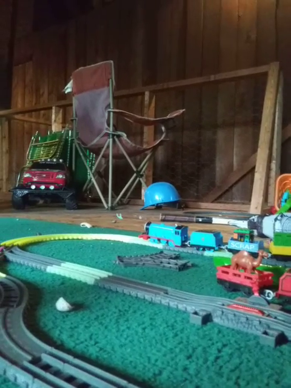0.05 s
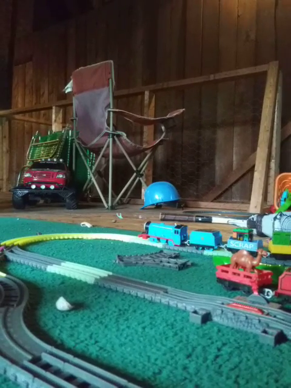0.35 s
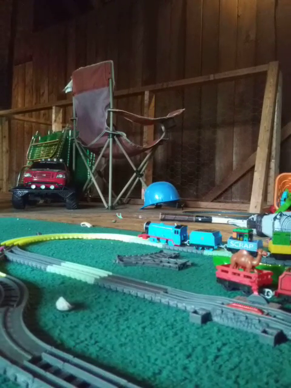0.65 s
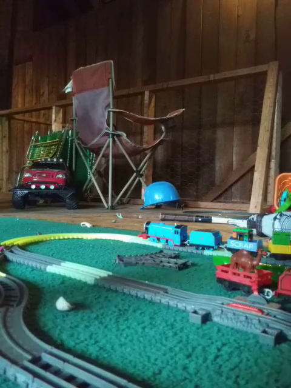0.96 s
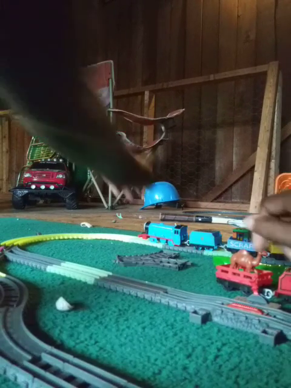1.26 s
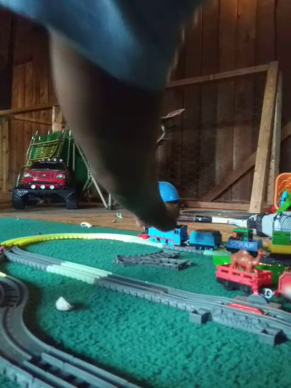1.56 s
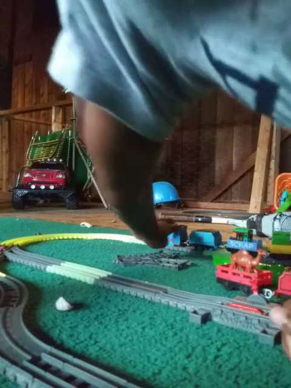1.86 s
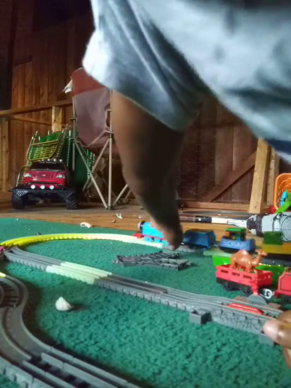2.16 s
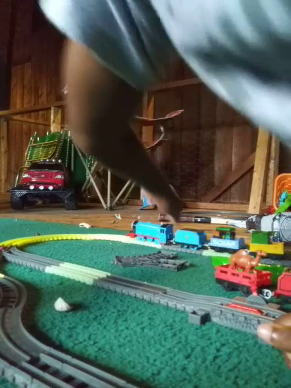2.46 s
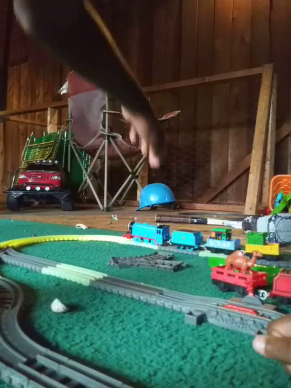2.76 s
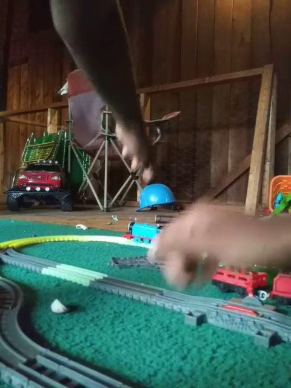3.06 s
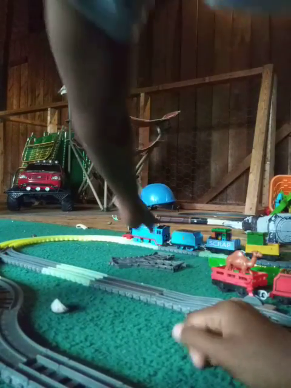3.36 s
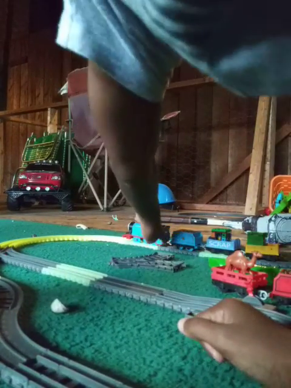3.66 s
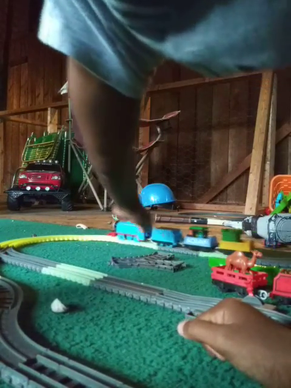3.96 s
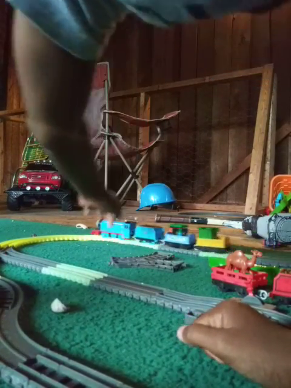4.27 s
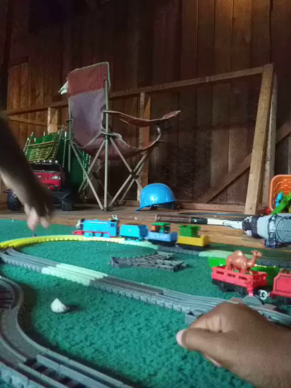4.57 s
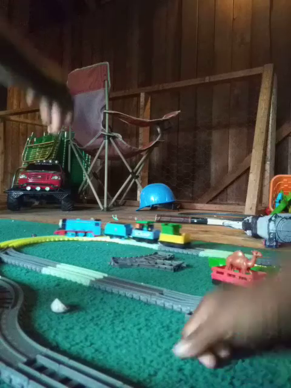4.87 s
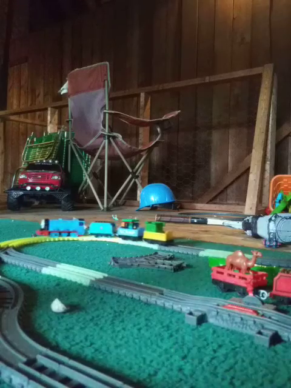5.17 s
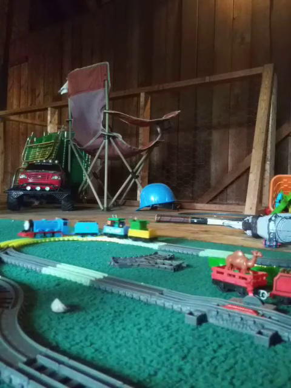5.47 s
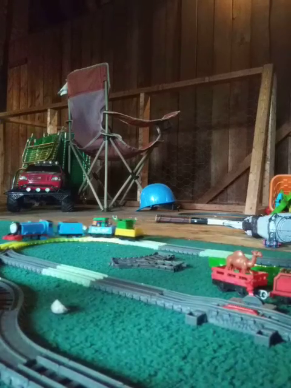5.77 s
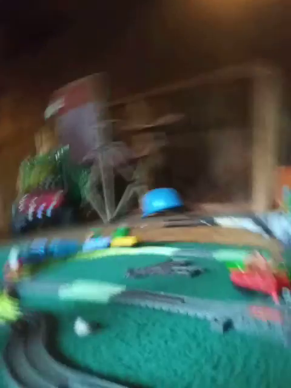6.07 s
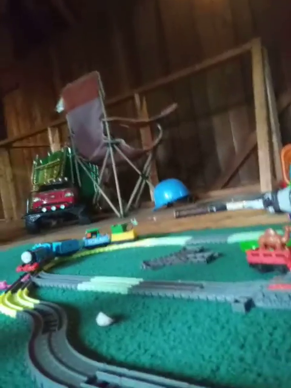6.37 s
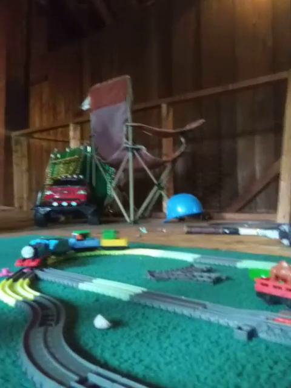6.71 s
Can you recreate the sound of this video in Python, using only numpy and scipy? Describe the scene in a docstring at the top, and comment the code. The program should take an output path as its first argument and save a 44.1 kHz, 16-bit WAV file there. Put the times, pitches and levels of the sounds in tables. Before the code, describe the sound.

A small battery toy train motor whirs quietly throughout, with a thin gear whine, in a wooden room with little echo. Plastic track clacks lightly in the first moment, and clothes swish close by at about 1 second, followed by soft bumps. From there the wheels rumble and rattle faintly along the track, swelling slightly when a hand pushes the engine around 2 and 4 seconds. Stiff plastic snaps in quick pairs at about 1.6, 2.8 and 4.6 seconds, and once more at 5.6. Wagons click sharply near 1.9 seconds, with a trail of smaller ticks, and again at 5. Clothing brushes softly now and then. At about 5.9 seconds fingers grab the microphone, making a dense run of close knocks, hollow thumps and rubbing, by far the loudest part. Lighter knocks and scratchy crackles follow from 6.5 seconds to the end, just before 7.

```python
"""A battery toy train whirs and rattles along plastic track on a carpet in a wooden room.
Gear teeth sound through its shell, wheels drum on the track, wagons click; under a pushing hand
it rumbles and rattles louder. Clothes brush past close by and stiff plastic snaps, mostly in pairs.
At the end a camera is grabbed and moved: fingers knock and rub on its case."""
import sys
import numpy as np
from scipy import signal
from scipy.fft import rfft, irfft, next_fast_len
from scipy.io import wavfile
from scipy.ndimage import map_coordinates

SR = 44100
rng = np.random.default_rng(int(sys.argv[2]) if len(sys.argv) > 2 else 0)


def materialize(psi):
    """Save the field psi as 16-bit PCM at rate SR to the path in sys.argv[1].

    A 1-D psi becomes a single channel; in a 2-D psi each row is a channel.
    """
    bounded = np.clip(np.atleast_2d(psi).T, -1, 1)
    quanta = np.round(bounded * 32767).astype(np.int16)
    wavfile.write(sys.argv[1], SR, quanta)


N = 301644
NOW_S = np.arange(N) / SR
AGE_S = np.arange(SR // 5) / SR  # time since a contact

# Room decay. Each row: frequency in Hz, t60 in seconds.
ROOM_DECAY = [(150, 0.12), (1500, 0.27), (10000, 0.23)]

# Noise spectra of cloth, skin, case and train. Each row: frequency in Hz, relative density in dB.
HISS_SPECTRUM = [(60, -50), (300, -15.5), (900, -3.5), (1500, 0), (2800, 3.5), (4000, -7), (5300, -8.5),
                 (6500, -5.5), (7800, -4.5), (9000, -14.5), (11500, -29), (15500, -47)]
RUSH_SPECTRUM = [(40, -45), (110, -20.5), (220, -1.5), (350, 7), (500, 5), (700, 6.5), (950, -2.5),
                 (1200, -6), (3000, -45)]
SKIN_SPECTRUM = [(300, -8), (900, 0), (1500, -2), (2800, 0.5), (4000, -5), (5300, -7.5), (6500, -7),
                 (7800, -1.5), (9000, -15.5), (11500, -27.5), (15500, -22)]
CRACKLE_SPECTRUM = [(100, -43), (500, -14), (2500, -41), (5000, -13.5), (7600, 1), (9500, -14.5),
                    (12000, -23), (15500, -40)]
CASE_SPECTRUM = [(80, -8), (200, 1), (500, -1.5), (1000, 4.5), (1500, -5), (2100, 1), (2800, -3.5),
                 (3800, -16), (5500, -19.5), (7600, -15), (9500, -31.5), (12000, -43), (15500, -35)]
HOLLOW_SPECTRUM = [(40, -5), (90, -0.5), (150, 1), (260, -1), (420, 5), (680, 1), (1000, -6.5),
                   (1600, -9.5), (3000, -57)]
RUMBLE_SPECTRUM = [(40, -37), (100, -18), (170, -8), (260, 2.5), (400, -3.5), (700, -8.5), (1100, -16),
                   (2000, -46.5)]
RATTLE_SPECTRUM = [(600, -35), (1300, -2), (1800, 7), (2200, 4.5), (2600, 8.5), (3200, -2.5), (4000, -12),
                   (5300, -18), (6500, -16), (7900, -10), (9300, -38), (12000, -72)]
GEAR_SPECTRUM = [(60, -6.5), (130, 8), (300, 8.5), (700, 8.5), (2800, -23.5), (4000, -12), (5500, -9.5),
                 (7600, -15), (9500, -15), (12000, -26), (15500, -19)]

# Modes of struck plastic parts. Each row: frequency in Hz, level in dB, t60 in seconds.
TRACK_MODES = [(598, -7.5, 0.057), (944, -15, 0.11), (1840, -8.5, 0.069), (2130, 0.5, 0.044),
               (2570, -2, 0.028), (3300, -11, 0.039), (4600, -11, 0.014)]
SNAP_MODES = [(340, -11.5, 0.044), (560, -3.5, 0.0049), (1132, -1, 0.012), (1494, -3, 0.012),
              (2288, -7, 0.012), (3320, -11.5, 0.0094), (4680, -14.5, 0.0088), (7500, -36, 0.0038),
              (9310, -15.5, 0.0051)]
WAGON_MODES = [(231, -23, 0.023), (1690, -5.5, 0.0078), (2510, -3.5, 0.01), (2780, -2, 0.0072),
               (3075, -8, 0.015), (4700, -25, 0.012), (8000, -29, 0.0068)]

# Axle and engine shell resonances. Each row: centre in Hz, width in Hz, gain in dB.
AXLE_PEAKS = [(1780, 73, -4), (2566, 58, 4), (2950, 220, -10), (4400, 140, -15.5), (6420, 220, -15.5),
              (7500, 250, -16.5), (8180, 190, -12.5)]
SHELL_PEAKS = [(292, 360, -11), (518, 67, -5.5), (916, 144, -2.5), (1310, 170, -3), (1640, 130, -4.5),
               (1740, 71, -2), (1903, 61, -2.5), (2350, 114, -5.5), (2560, 250, -7), (2940, 170, -11),
               (3240, 130, -10.5), (7500, 900, -14.5)]

# Clothes brushing, fingers sliding. Each row: start and length in seconds, hiss and low rush in dB.
CLOTH_STROKES = [(0, 0.048, -51, -56.5), (.09, 0.13, -52, -40), (.41, 0.045, -53, -54),
                 (.68, .19, -54, -59.5), (.89, 0.27, -36.5, -34.5), (1.15, 0.23, -63.5, -64),
                 (1.38, 0.15, -48, -58), (2.57, .16, -51, -59), (2.81, 0.14, -49, -47.5),
                 (4.66, 0.67, -55.5, -53), (5.48, .29, -48.5, -43.5), (5.73, 0.15, -53.5, -45.5)]
FINGER_STROKES = [(2.61, .08, -50.5, -47), (5.94, 0.089, -39.5, -27.5), (6.008, 0.15, -28.5, -27),
                  (6.14, 0.13, -45, -23.5), (6.25, .1, -60, -42.5), (6.38, 0.078, -57, -51.5),
                  (6.51, 0.12, -41, -36), (6.578, 0.071, -24, -37.5), (6.655, 0.054, -37.5, -40),
                  (6.7, 0.15, -45, -45)]
# Knocks on and beside the camera.
# Each row: start in seconds, level in dB, ring in Hz, t60 in seconds, thud in dB.
CASE_KNOCKS = [(0.055, -38, 607, 0.043, -33.5), (0.1308, -20, 1117, 0.03, -27),
               (0.166, -35, 586, 0.11, -24), (.418, -27, 460, 0.022, -46), (2.663, -31.5, 560, 0.025, -41),
               (3.424, -38, 920, 0.029, -58), (4.046, -31, 886, 0.018, -46),
               (4.7951, -30.5, 1400, 0.019, -50), (5.928, -26.5, 1180, 0.067, -18.5),
               (5.945, -16.5, 2250, 0.039, -41), (5.96, -3.5, 1160, 0.033, -2.5),
               (6.0128, -5.5, 1066, 0.038, -4.5), (6.0465, -7.5, 490, 0.024, -4.5),
               (6.084, -4, 928, 0.042, -15), (6.15, -9, 620, 0.038, -16), (6.1592, -13, 854, 0.1, -12),
               (6.185, -20.5, 1790, .034, -30), (6.198, -9.5, 493, 0.033, -8.5),
               (6.2092, -7.5, 1360, 0.017, -20), (6.2162, -10, 1937, 0.06, -27),
               (6.2406, -6, 1870, 0.021, -24), (6.308, -24.5, 1926, 0.025, -23),
               (6.471, -26.5, 1150, 0.051, -53.5), (6.486, -27.5, 1217, 0.11, -47),
               (6.516, -24, 1320, 0.035, -48), (6.5371, -12, 1150, 0.019, -17.5),
               (6.581, -21.5, 1950, 0.042, -23), (6.597, -8.5, 855, 0.011, -28),
               (6.653, -18.5, 2020, 0.0096, -33.5), (6.699, -10.5, 1290, 0.0066, -38),
               (6.7615, -14, 1430, 0.013, -16.5)]
# Soft bumps through floor and case. Each row: start in seconds, level in dB, pitch in Hz.
SOFT_BUMPS = [(0.09, -29, 193), (0.107, -27, 130), (1.097, -21.5, 396), (1.3311, -21.5, 201),
              (1.856, -39, 203), (2.584, -32.5, 127), (5.955, -3.5, 238), (5.993, -10, 200),
              (6.097, -6.5, 215), (6.162, -5.5, 171), (6.221, -8.5, 259), (6.315, -26, 204)]
# Cloth and skin catching. Each row: start in seconds, level in dB.
CRACKLES = [(.012, -26.5), (0.0281, -27.5), (0.3843, -32), (2.2895, -45), (2.6526, -20.5), (5.9594, -12),
            (6.081, -14), (6.5972, -14), (6.636, -10), (6.6835, -16), (6.734, -23), (6.7968, -20.5)]
# Track settling. Each row: start in seconds, level in dB, factor on the ring time.
TRACK_CLACKS = [(0.0894, -22.5, 0.51), (.103, -22, 0.42), (.212, -22, 1.25)]
# Plastic snapping over and back. Each row: start in seconds, level in dB, relative crack in dB.
PLASTIC_SNAPS = [(1.618, -24.5, -6), (1.666, -17.5, -1.5), (2.772, -12.5, -5), (2.8, -18, -0.5),
                 (4.639, -9.5, -3), (4.6692, -16.5, -2.5), (5.6054, -20, -1.5)]
# Wagons and couplings clicking. Each row: start in seconds, level in dB, ring in Hz.
WAGON_CLICKS = [(1.487, -25.5, 3300), (1.5125, -35, 3480), (1.583, -29.5, 2860), (1.607, -33, 3070),
                (1.859, -8, 2330), (1.881, -23, 2740), (1.89, -24, 2770), (1.9662, -20, 2140),
                (1.979, -22, 1880), (2.0058, -29, 1880), (2.04, -31, 2030), (2.135, -34.5, 1920),
                (3.892, -32.5, 6560), (4.115, -38, 2900), (5.064, -17, 1690), (5.19, -32.5, 1990),
                (5.2143, -33.5, 1980)]
# A hand pushing the engine.
# Each row: start and length in seconds, rumble and rattle in dB, one unused value.
HAND_PUSHES = [(1.6, 0.16, -54.5, -61, -70), (2.15, .27, -57, -60.5, -49), (3.82, .17, -54, -50.5, -47),
               (3.94, 0.24, -59, -53, -51), (4.16, 0.31, -69, -55.5, -48)]
# Free rolling. Each row: time in seconds, rumble in dB, rattle in dB.
ROLL_LEVELS = [(1.1, -60, -63), (1.4, -53, -61.5), (2.05, -58.5, -56.5), (2.55, -64, -58),
               (2.95, -57.5, -66.5), (3.75, -60, -65), (4.55, -51.5, -58.5), (4.72, -51.5, -53),
               (5.03, -48, -54.5), (5.33, -54, -59), (5.55, -52, -54)]
# Gear whine. Each row: multiple of the shaft rate, level in dB.
WHINE_PARTIALS = [(3, -12.5), (5, 0.5), (14, -2.5), (20, -4.5), (29, -20), (33, -1), (41, 4)]
# Motor level, set by distance and load. Each row: time in seconds, level in dB.
MOTOR_LEVELS = [(0, -53.5), (.6, -57), (1.3, -53.5), (2.1, -58.5), (3.1, -55), (3.7, -58.5), (4.5, -60.5),
                (5.4, -57), (6.4, -51.5), (6.84, -50)]


def amp(db):
    """Decibels to gain."""
    return 10 ** (np.asarray(db) / 20)


def unit_rms(x):
    """Scale to rms 1."""
    return x / np.sqrt(np.mean(x ** 2) + 1e-20)


def unit_peak(x):
    """Scale to peak 1."""
    return x / (np.abs(x).max() + 1e-20)


def log_interp(points, hz):
    """Read (Hz, value) points on a log axis."""
    knots_hz, values = np.transpose(points)
    return np.interp(np.log(hz + 1), np.log(knots_hz + 1), values)


def curves(rows):
    """Per-sample curve for each column after the time."""
    times_s, *columns = np.transpose(rows)
    return [np.interp(NOW_S, times_s, column) for column in columns]


def wobble(rate_hz):
    """Smooth random curve."""
    return map_coordinates(rng.standard_normal(int(N * rate_hz / SR) + 4), [NOW_S * rate_hz])


def strokes(rows, column, roundness=0.67):
    """Gain of strokes that swell and die; column picks the level."""
    gain = np.zeros(N)
    for row in rows:
        start_s, length_s = row[:2]
        progress = np.clip((NOW_S - start_s) / length_s, 0, 1)
        gain += amp(row[column]) * np.abs(np.sin(np.pi * progress)) ** roundness
    return gain


def filtered(x, response):
    """Apply a complex frequency response."""
    size = next_fast_len(len(x) + SR // 4)
    return irfft(rfft(x, size) * response(np.fft.rfftfreq(size, 1 / SR)), size)[:len(x)]


def coloured(x, spectrum, size=4096):
    """Minimum-phase filter with the given spectrum."""
    cepstrum = irfft(np.log(amp(log_interp(spectrum, np.fft.rfftfreq(size, 1 / SR)))))
    cepstrum[1:size // 2] *= 2
    cepstrum[size // 2 + 1:] = 0
    return signal.fftconvolve(x, irfft(np.exp(rfft(cepstrum))))[:len(x)]


def resonances(x, peaks, edge_hz):
    """Drive a body's resonances, rolled off above edge_hz; rms 1."""
    def response(hz):
        body = 0
        for k, (centre_hz, width_hz, db) in enumerate(peaks):
            damping = 1j * hz * width_hz
            body += (-1) ** k * amp(db) * damping / (centre_hz ** 2 - hz ** 2 + damping)
        return body / (1 + (hz / edge_hz) ** 12)
    return unit_rms(filtered(x, response))


def grainy(rate_hz, spread_db, share):
    """Noise of rms 1; tiny uneven contacts carry a share of the power."""
    contacts = (rng.random(N) < rate_hz / SR) * rng.choice([-1, 1], N)
    sizes = amp(spread_db * np.clip(rng.standard_normal(N), -2, 2))
    return np.sqrt(share) * unit_rms(contacts * sizes) + np.sqrt(1 - share) * rng.standard_normal(N)


def texture(spectrum, rate_hz, spread_db, share):
    """Coloured grainy noise, rms 1."""
    return unit_rms(coloured(grainy(rate_hz, spread_db, share), spectrum))


def fade(t60_s):
    """Exponential decay."""
    return np.exp(-np.log(1000) * AGE_S / t60_s)


def mode(hz, t60_s):
    """One damped vibration."""
    return np.sin(2 * np.pi * hz * AGE_S) * fade(t60_s)


def ring(modes, scatter_db, detune):
    """Struck body; each blow hits a new spot and reweights the modes."""
    out = 0
    for k, (hz, db, t60_s) in enumerate(modes):
        weight = (-1) ** k * amp(db + scatter_db * rng.normal())
        out += weight * mode(hz * (1 + detune * rng.normal()), t60_s)
    return unit_peak(out)


def burst(spectrum, t60_s):
    """Dying chatter of micro-contacts."""
    chatter = coloured(rng.standard_normal(len(AGE_S)) * fade(t60_s), spectrum)
    return 0.5 * chatter * np.linalg.norm(fade(t60_s)) / np.linalg.norm(chatter)


def add(out, start_s, sound):
    """Mix a sound in at start_s."""
    start = round(start_s * SR)
    out[start:start + len(sound)] += sound[:N - start]


def room(x):
    """Short reverberation off wooden walls, 5 ms late."""
    hz, age_s, noise = signal.stft(rng.standard_normal(SR // 2), SR, nperseg=256)
    decay = np.exp(-np.log(1000) * age_s / log_interp(ROOM_DECAY, hz)[:, None])
    tail = signal.istft(noise * decay, SR, nperseg=256)[1]
    return signal.fftconvolve(x, np.pad(tail / np.linalg.norm(tail), (SR // 200, 0)))[:N]


def friction(rows, hiss_spectrum, rush_spectrum, grain_share):
    """Sliding cloth or skin hisses with speed; pressure adds a low rush."""
    speed, pressure = strokes(rows, column=2), strokes(rows, column=3)
    hiss = speed * amp(2.3 * wobble(60)) * texture(hiss_spectrum, 2500, 2.5, grain_share)
    rush = pressure * amp(0.31 * wobble(36)) * texture(rush_spectrum, 600, 3.5, 0.49)
    return hiss + rush


def handling(thud_hz=200, thud_t60_s=0.029, bump_t60_s=0.028, flesh_s=0.0008):
    """Knocks chatter in the case, ring the touched spot and thud; soft bumps flex it with a dull puff."""
    out = np.zeros(N)
    press = 1 - np.exp(-AGE_S / flesh_s)
    for start_s, db, hz, t60_s, thud_db in CASE_KNOCKS:
        thud = mode(thud_hz * np.exp(0.12 * rng.normal()), thud_t60_s)
        # neighbouring wall modes beat against the main one
        partners = sum(mode(hz * ratio * (1 + 0.083 * rng.normal()), 1.31 * t60_s)
                       for ratio in (0.84, 1.25))
        spot = mode(hz, t60_s) - amp(-7) * partners
        knock = burst(CASE_SPECTRUM, t60_s) + amp(-2.5) * press * spot
        add(out, start_s, amp(db) * knock + amp(thud_db) * press * thud)
    for start_s, db, hz in SOFT_BUMPS:
        flex = mode(hz, bump_t60_s) + amp(-6) * mode(2.07 * hz, t60_s=0.018)
        puff = amp(-4) * burst(HOLLOW_SPECTRUM, t60_s=0.014)
        add(out, start_s, -amp(db) * unit_peak(press * (flex + puff)))
    return out


def crackles(regrip_s=(6.63, 6.76), regrip_db=-24, count=6):
    """Cloth and skin catch briefly; a shifting grip adds random catches."""
    out = np.zeros(N)
    catches = [(rng.uniform(*regrip_s), regrip_db + 1.5 * rng.normal()) for _ in range(count)]
    for start_s, db in CRACKLES + catches:
        add(out, start_s, amp(db) * unit_peak(burst(CRACKLE_SPECTRUM, t60_s=0.00097)))
    return out


def snaps():
    """Stiff plastic snaps over with a crack and a short ring."""
    out = np.zeros(N)
    for start_s, db, crack_db in PLASTIC_SNAPS:
        body = ring(SNAP_MODES, scatter_db=2.5, detune=0.024)
        crack = amp(crack_db) * burst(HISS_SPECTRUM, t60_s=0.0076)
        add(out, start_s, amp(db) * (body + crack))
    return out


def track_clacks():
    """A piece of track clacks down, rings and settles."""
    out = np.zeros(N)
    for start_s, db, ring_factor in TRACK_CLACKS:
        modes = [(hz, mode_db, t60_s * ring_factor) for hz, mode_db, t60_s in TRACK_MODES]
        body = ring(modes, scatter_db=2.5, detune=0.0058)
        chatter = amp(3.5) * burst(CASE_SPECTRUM, t60_s=0.027)
        add(out, start_s, amp(db) * (body + chatter))
    return out


def wagon_clicks(hits=3, t60_s=0.013, rebound_s=0.0058, loss_db=5.5, cap_db=-22.5):
    """Each click rings a wagon and rebounds ever more weakly; the coupling's play caps the rebound."""
    out = np.zeros(N)
    contact = 1 - np.exp(-AGE_S / 0.0001)  # the plastic gives a little
    for start_s, db, hz in WAGON_CLICKS:
        for _ in range(hits):
            spot = amp(-3) * mode(hz * np.exp(0.022 * rng.normal()), t60_s)
            body = amp(-3) * ring(WAGON_MODES, scatter_db=4.5, detune=0.048)
            chatter = amp(-8) * burst(RATTLE_SPECTRUM, t60_s)
            add(out, start_s, amp(db) * contact * (body + spot + chatter))
            start_s += rebound_s * np.exp(0.2 * rng.normal())
            db = min(db, cap_db) - loss_db
    return out


def wheels(start_s=0.8, rise_s=0.04):
    """Wheels drum on hollow track, wagons rattle and axles tick, all harder under a push."""
    rumble_db, rattle_db = curves(ROLL_LEVELS)
    drumming = amp(rumble_db) + strokes(HAND_PUSHES, column=2)
    shaking = amp(rattle_db) + strokes(HAND_PUSHES, column=3)
    rumble = drumming * amp(2.7 * wobble(20)) * texture(RUMBLE_SPECTRUM, 300, 2.9, 0.45)
    rattle = texture(RATTLE_SPECTRUM, rate_hz=350, spread_db=6.2, share=0.39)
    ticks = resonances(grainy(rate_hz=70, spread_db=4.5, share=0.99), AXLE_PEAKS, edge_hz=12000)
    loose_parts = shaking * amp(0.33 * wobble(35)) * (rattle + amp(-7) * ticks)
    return np.clip((NOW_S - start_s) / rise_s, 0, 1) * (rumble + loose_parts)


def motor(shaft_hz=63.9, teeth=4, drift=0.0072):
    """Gears scrape once a tooth, harder once a turn, through the shell; the shaft ticks and whines."""
    turns = np.cumsum(shaft_hz * (1 + drift * wobble(4))) / SR
    angle_rad = 2 * np.pi * turns
    load = (1 + 0.26 * np.cos(angle_rad)) * (1 + 0.16 * np.cos(teeth * angle_rad))
    shell = resonances(load * grainy(700, 1.4, 0.13), SHELL_PEAKS, edge_hz=9200)
    mesh = unit_rms(coloured(load * grainy(400, 5.8, 0.4), GEAR_SPECTRUM))
    play = np.exp(-9 * (turns % 1)) * amp(2.3 * wobble(50))  # the loose shaft knocks unevenly
    ticks = unit_rms(coloured(play * rng.standard_normal(N), RATTLE_SPECTRUM))
    whine = sum(amp(db + 2 * wobble(7.5)) * np.sin(multiple * angle_rad)
                for multiple, db in WHINE_PARTIALS)
    gain = amp(curves(MOTOR_LEVELS)[0] + 0.58 * wobble(11))
    return gain * (shell + amp(-7) * mesh + amp(-12) * ticks + amp(-15) * whine)


def scene(small_parts_hz=170):
    """Train, clothes and hands; only the impacts feed the room."""
    # small parts radiate little bass
    highpass = signal.butter(2, small_parts_hz, "highpass", fs=SR, output="sos")
    clicks = signal.sosfilt(highpass, wagon_clicks() + track_clacks() + snaps() + crackles())
    knocks = handling()
    train = motor() + wheels()
    clothes = friction(CLOTH_STROKES, HISS_SPECTRUM, RUSH_SPECTRUM, grain_share=0.24)
    fingers = friction(FINGER_STROKES, SKIN_SPECTRUM, HOLLOW_SPECTRUM, grain_share=0.79)
    reverb = room(amp(-21) * clicks + amp(-27) * knocks)
    return (train + clothes + fingers + clicks + knocks + reverb)[None]


def record(dry, bass_hz=80, treble_hz=11000, top_hz=15850, top_db=-8, ceiling=0.72):
    """Microphone: bass cut, soft peak limit, treble slope, band limit."""
    thin = signal.sosfilt(signal.butter(4, bass_hz, "highpass", fs=SR, output="sos"), dry[0])
    limited = thin / (1 + np.abs(thin / ceiling) ** 6) ** (1 / 6)
    response = lambda hz: amp(np.interp(hz, [treble_hz, top_hz], [0, top_db])) * (hz < top_hz)
    return filtered(limited, response)[None]


dry = scene()
out = record(dry)
materialize(out)
```